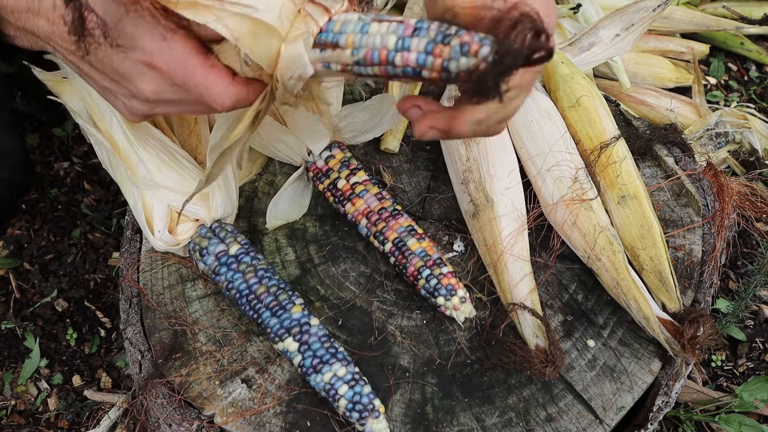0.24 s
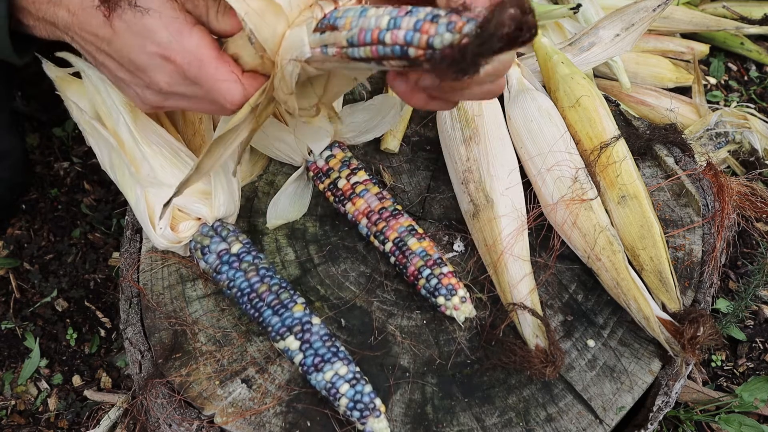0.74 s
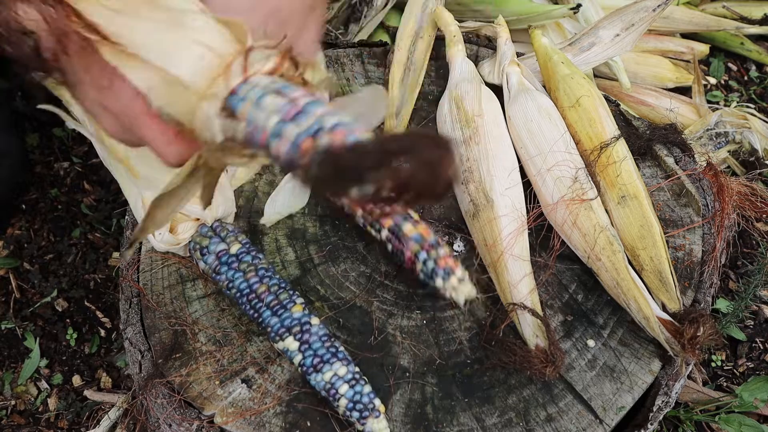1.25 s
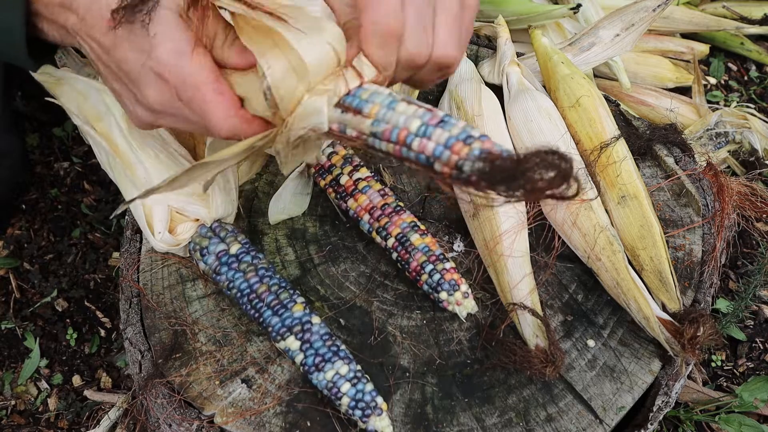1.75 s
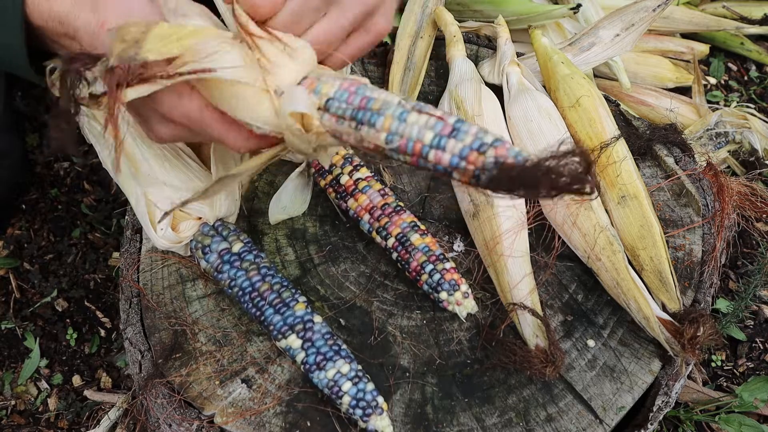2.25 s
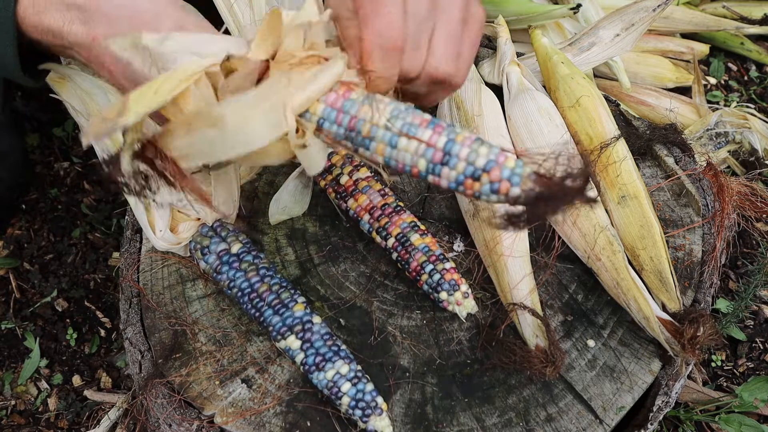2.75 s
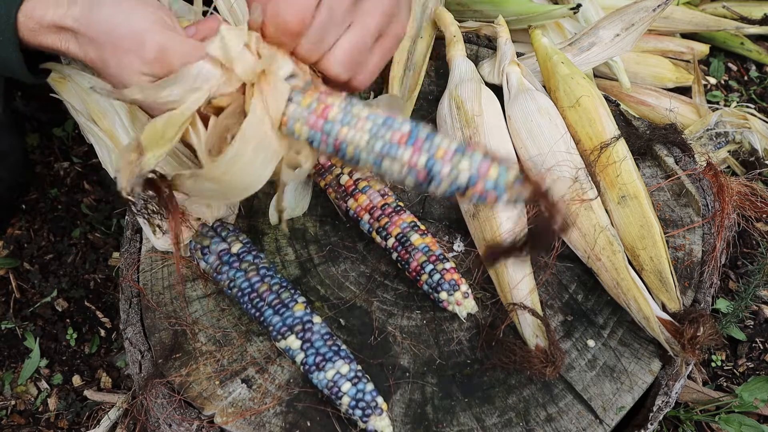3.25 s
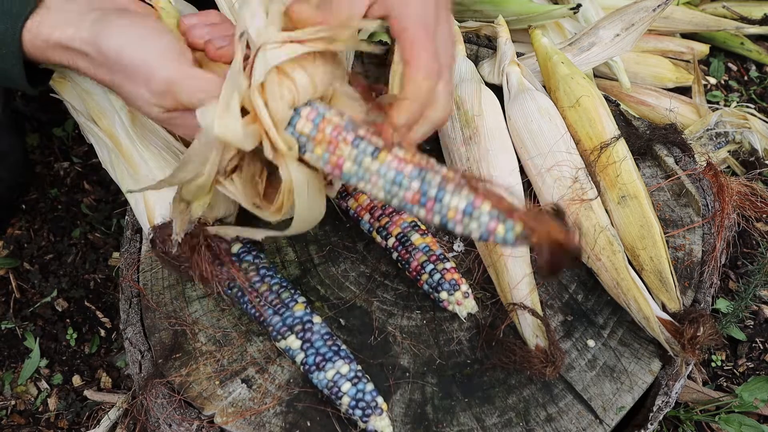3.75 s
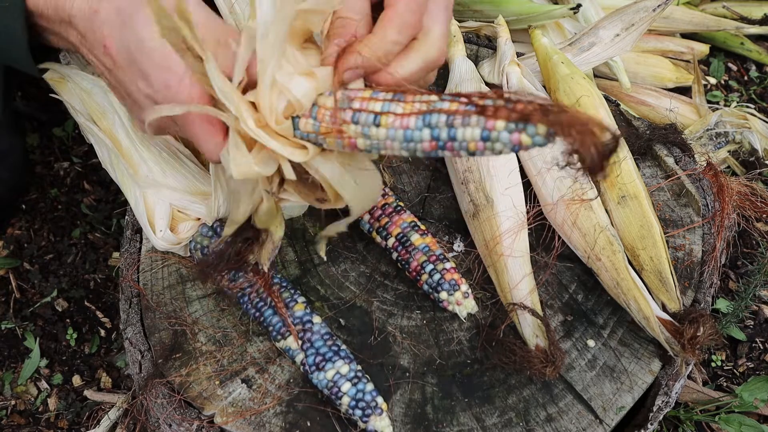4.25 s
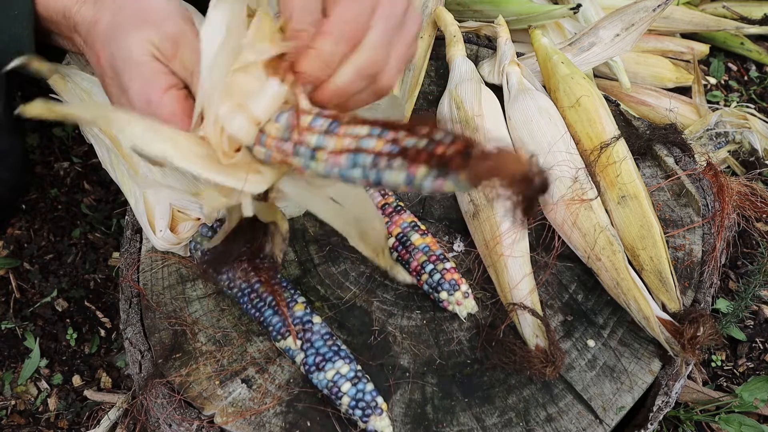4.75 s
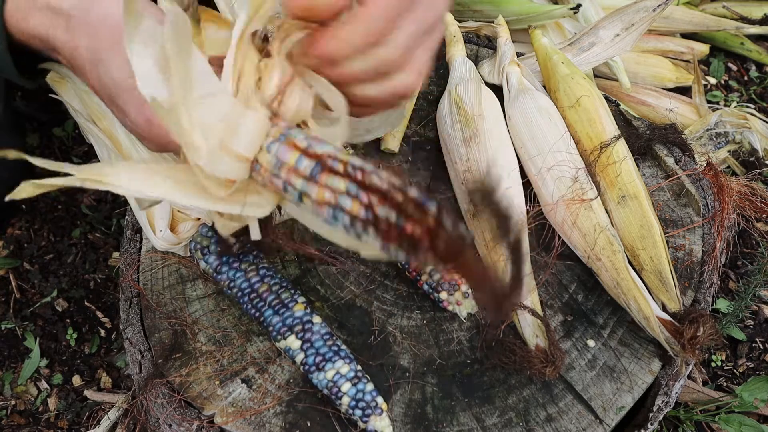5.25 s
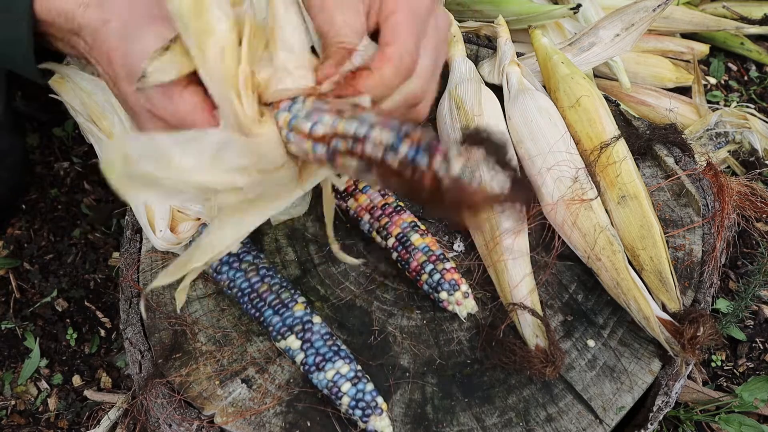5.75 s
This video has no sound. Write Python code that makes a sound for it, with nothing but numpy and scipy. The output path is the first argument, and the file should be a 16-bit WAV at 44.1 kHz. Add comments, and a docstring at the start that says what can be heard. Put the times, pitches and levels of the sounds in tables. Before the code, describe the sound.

Close, crisp rustling and fibrous tearing of dry husk, with brittle cracks, tiny ticks and one dull knock, in quiet outdoor air.

```python
"""Hands peel the dry husks back from a corn cob, outdoors, close by.
Each pull rubs leaf on leaf and tears fibres: filtered noise and tiny random impulses make the rustle.
Sharp snaps, where a rib gives way, are short noise bursts that ring the husk; loose fibres tick.
Fingers drag on leaves (soft notes made of impulses); a few dull knocks ring the cob (fading sine waves).
Behind it are outdoor air (filtered noise) and a faint motor hum that comes and goes (a wavering sine)."""
import sys
import numpy as np
from scipy import signal
from scipy.fft import rfft, irfft, next_fast_len
from scipy.io import wavfile
from scipy.ndimage import uniform_filter1d, map_coordinates

SR = 44100
rng = np.random.default_rng(int(sys.argv[2]) if len(sys.argv) > 2 else 0)


def dump(signal):
    """Clip the signal to [-1, 1] and save it as 16-bit WAV at the path in sys.argv[1]."""
    limited = np.clip(np.atleast_2d(signal).T, -1, 1)
    pcm = np.round(limited * 32767).astype(np.int16)
    wavfile.write(sys.argv[1], SR, pcm)


N = 264644  # length of the scene in samples
LEAD_S = .012  # fibres start to give this long before a rib breaks


def amp(db):
    """Turn decibels into a gain."""
    return 10 ** (np.asarray(db) / 20)


def unit(x):
    """Scale x so that its average strength (rms) is 1."""
    return x / np.sqrt(np.mean(x ** 2) + 1e-20)


def shape(points, hz):
    """Gain at each frequency, from (frequency_hz, level_db) points joined on a log axis."""
    point_hz, point_db = np.transpose(points)
    return amp(np.interp(np.log(hz + 1), np.log(point_hz + 1), point_db))


def curve(rows):
    """Join (time_s, value) points into one value per sample."""
    time_s, value = np.transpose(rows)
    return np.interp(np.arange(N) / SR, time_s, value)


def wobble(rate):
    """A smooth random curve through this many random points a second."""
    points = rng.standard_normal(int(N * rate / SR) + 4)
    return map_coordinates(points, [np.arange(N) * rate / SR])


def filtered(x, gain):
    """Filter x to this gain against frequency, with no response ahead of its cause (minimum phase)."""
    size = 2 * next_fast_len(len(x))
    hz = np.fft.rfftfreq(size, 1 / SR)
    cepstrum = irfft(np.log(np.maximum(gain(hz), 1e-6)))
    # folding the second half onto the first puts the response after its cause
    cepstrum[1:size // 2] *= 2
    cepstrum[size // 2 + 1:] = 0
    response = np.exp(rfft(cepstrum))
    return irfft(rfft(x, size) * response)[:len(x)]


def add(track, s, sound):
    """Mix a sound into the track at time s, in seconds."""
    part = track[max(round(s * SR), 0):][:len(sound)]
    part += sound[:len(part)]


def pulling():
    """Levels in dB of rustle, hiss and flutter: pulls take hold, build, slide and let go, over handling."""
    # pulls on the husk: start_s, build_s, slide_s, release_s, peak_db,
    # hiss_db and flutter_db (both relative to the rustle)
    pulls = [(0.024, .005, .014, 0.033, -56, -5, -15.5), (0.135, 0.032, 0.055, 0.052, -67, 1, -17),
             (0.244, 0.0034, 0.072, 0.011, -55, -4.5, -10.5), (1.05, 0.096, 0.0073, 0.031, -48.5, -4.5, -9),
             (1.247, 0.015, .035, 0.035, -48, -12, -11.5), (1.312, 0.002, .014, 0.074, -46, -6, -12),
             (1.341, 0.042, 0.036, 0.1, -50, 2, -3), (1.439, 0.033, 0.089, 0.13, -53, 1, -6),
             (1.722, .054, 0.0097, 0.044, -50.5, -6.5, -11), (1.809, 0.016, 0.058, .08, -53.5, -11, -15),
             (1.955, .025, 0.057, 0.017, -45, -7, -11.5), (2.135, .035, .035, .04, -56, -6, -2),
             (2.205, .012, .06, 0.019, -43.5, -6, -13.5), (2.454, 0.026, 0.059, 0.11, -59, -3, -13),
             (2.753, .015, 0.06, 0.023, -49, -12, -11), (3.018, 0.0064, .06, 0.14, -60, -8.5, -18),
             (3.184, 0.022, 0.026, 0.053, -60, -6, -11), (3.27, .025, .05, 0.029, -42, -6.5, -12),
             (3.412, .025, .03, .06, -51, -9, -14), (3.45, .03, .02, .07, -45, -16.5, -17),
             (3.751, .003, .052, 0.062, -56, -3.5, -14.5), (3.959, 0.0061, 0.078, 0.074, -59, -6, -7.5),
             (4.165, .015, .04, 0.072, -53, -7.5, -10.5), (4.24, 0.018, .038, 0.059, -57, 0, -15.5),
             (4.454, 0.023, 0.021, 0.14, -64, -19, -17), (4.86, .077, .02, .08, -45.5, -6, -11.5),
             (5.05, .064, .016, .06, -43.5, -7.5, -17), (5.369, .003, 0.087, 0.054, -61, -0.5, -19),
             (5.616, .003, .025, 0.049, -51.5, 0, -21), (5.66, 0.019, 0.016, 0.056, -52.5, -16, -19),
             (5.752, 0.0069, 0.038, 0.084, -58.5, -9.5, -30), (5.94, .02, 0.038, 0.037, -43, -9.5, -11.5)]
    # light rustle of the husk held between pulls: time_s, level_db
    handling = [(0, -70), (.4, -81), (.85, -80), (1.0, -65), (1.3, -58), (1.68, -78), (1.9, -60.5),
                (2.07, -72.5), (2.4, -68), (2.62, -72), (3.0, -68), (3.58, -69), (3.95, -64), (4.6, -64),
                (4.8, -69), (5.03, -61.5), (5.21, -78), (5.55, -66.5)]
    held_hiss_db, held_flutter_db = -6.5, -9  # relative to the handling level
    # a pull grows as the leaf tightens and sags as it slides
    build_db_per_s, sag_db_per_s = 199.5, 63.5
    # the grip takes hold over attack_s, ahead of the start; attack and release each span fade_db
    attack_s, fade_db = .02, 31.5

    t = np.arange(N) / SR
    held_db = curve(handling) + np.array([[0], [held_hiss_db], [held_flutter_db]])
    power = amp(held_db) ** 2
    for start, build, slide, release, peak_db, hiss_db, flutter_db in pulls:
        age = t - start
        tightening = build_db_per_s * np.minimum(age - build, 0)
        sagging = sag_db_per_s * np.maximum(age - build, 0)
        taking_hold = np.minimum(age, 0) / attack_s
        letting_go = np.maximum(age - build - slide, 0) / release
        course_db = tightening - sagging + fade_db * (taking_hold - letting_go)
        part_db = peak_db + np.array([[0], [hiss_db], [flutter_db]])
        power += amp(part_db) ** 2 * amp(np.maximum(course_db, -100)) ** 2
    return 10 * np.log10(power)


def rustle(level_db, hiss_db, flutter_db):
    """A harder pull breaks more fibres a second; they come in clumps, over the smooth rub of leaf on leaf."""
    # tone colours of the low flutter, the crackle and the fine hiss: frequency_hz, relative level_db (per Hz)
    flutter_tone = [(60, -43), (200, -2), (330, -3.5), (550, 3), (850, -6), (1250, -6.5), (2200, -34.5)]
    crackle_tone = [(400, -35), (900, -15), (1400, -3), (1950, -3), (2600, 1), (5000, 1.5), (7000, -7),
                    (11000, -29.5)]
    hiss_tone = [(3000, -25.5), (5200, -0.5), (6800, 1), (8500, -2), (10000, -4.5), (12000, -9),
                 (16000, -22)]

    rate = 1300 * amp(.75 * (level_db + 58))  # breaks per second
    grip = unit(amp(0.74 * wobble(60) + 1.64 * wobble(300)))  # uneven strength makes the clumps
    shared = fractures(rate, spread_db=5.0)  # breaks heard in all three parts

    def part(spectrum, rub_db, own_db):
        """One part: shared breaks, its own breaks and the rub, coloured by the husk."""
        own = amp(own_db) * fractures(rate, spread_db=2.0)
        rub = amp(rub_db) * rng.standard_normal(N)
        drive = grip * (shared + own + rub)
        coloured = filtered(drive, lambda hz: shape(spectrum, hz) * husk(hz))
        return unit(flexing(coloured, depth_db=2.5))

    flutter = amp(flutter_db) * part(flutter_tone, rub_db=-2.5, own_db=2.5)
    crackle = amp(level_db) * part(crackle_tone, rub_db=0.5, own_db=-2)
    hiss = amp(hiss_db) * part(hiss_tone, rub_db=3.5, own_db=0.5)
    return flutter + crackle + hiss


def fractures(rate, spread_db):
    """Tiny impulses at random moments, most weak and a few strong, at steady mean power."""
    chance = np.clip(rate / SR, 1e-4, 1)  # of a break in each sample
    strength = np.minimum(rng.exponential(size=N), 3.5)
    sizes = amp(spread_db * strength) * rng.choice([-1, 1], N)
    happens = rng.random(N) < chance
    return unit(happens * sizes / np.sqrt(chance))  # rarer breaks are made larger


def husk(hz, between_db=-8):
    """Gain of the husk: broad, heavily damped resonances, with a floor between them."""
    # resonances of the bunched husk: centre_hz, width_hz, level_db
    resonances = [(1405, 690, -2.5), (2573, 460, -0.5), (3140, 350, -4), (4350, 1250, -5.5),
                  (5700, 540, -8.5), (7000, 2600, -5.5)]
    power = amp(between_db) ** 2
    for centre, width, db in resonances:
        power = power + amp(db) ** 2 / (1 + (2 * (hz - centre) / width) ** 2)
    return np.sqrt(power)


def flexing(x, depth_db):
    """A bending leaf changes shape, so its resonances swell and fade from moment to moment."""
    spectrogram = signal.stft(x, nperseg=256)[2]
    field = rng.standard_normal(spectrogram.shape)
    field = uniform_filter1d(field, size=6, axis=0)  # smooth across frequency
    field = uniform_filter1d(field, size=9, axis=1)  # smooth across time
    return signal.istft(spectrogram * amp(depth_db * unit(field)), nperseg=256)[1][:N]


def snaps():
    """The ribs give way one by one, each with its own level, pitch and length of splintering."""
    # ribs that break: time_s, level_db, pitch_hz,
    # splinter_t60_s (time to fade by 60 dB: short = clean click, long = crunch)
    ribs = [(0.0155, -50.5, 4630, 0.0067), (0.0257, -45, 3880, 0.0049), (0.0466, -58, 4050, 0.0044),
            (0.2447, -49.5, 3790, .015), (0.4978, -66.5, 3820, 0.0094), (0.6456, -57.5, 6760, 0.0054),
            (0.651, -63, 4350, 0.031), (0.822, -70, 2700, .04), (1.1438, -38.5, 3530, 0.0076),
            (1.1545, -38.5, 3450, 0.0088), (1.223, -43, 5995, .005), (1.2264, -42, 7000, 0.0055),
            (1.2498, -63, 2900, .008), (1.312, -27.5, 4070, .014), (1.3234, -32.5, 3400, 0.026),
            (1.6153, -52.5, 4395, 0.02), (1.658, -58.5, 5830, .006), (1.6964, -59, 5260, .006),
            (1.7681, -44, 3770, 0.0065), (1.9469, -40.5, 3840, 0.0078), (1.9715, -42, 3320, 0.0088),
            (1.98, -35.5, 3120, 0.011), (2.1275, -54, 2690, 0.0074), (2.1464, -47, 2560, 0.0098),
            (2.1741, -44.5, 2900, 0.014), (2.2111, -22, 3740, 0.0053), (2.2137, -31.5, 3998, .015),
            (2.235, -36, 3450, 0.0099), (2.2595, -38, 4710, 0.0062), (2.272, -36.5, 4790, .008),
            (2.281, -48, 3900, .006), (2.4617, -52, 2400, 0.0074), (2.6924, -52.5, 2650, 0.0085),
            (2.7984, -44.5, 2710, 0.0077), (2.9385, -38.5, 3890, 0.01), (3.015, -44.5, 3300, 0.053),
            (3.075, -54.5, 3900, 0.016), (3.1312, -55, 6550, 0.0056), (3.178, -55.5, 4840, 0.0051),
            (3.2172, -44, 2810, 0.013), (3.238, -47, 3100, 0.0083), (3.2595, -36.5, 3520, 0.0052),
            (3.265, -37, 3720, 0.0033), (3.291, -30.5, 4000, 0.021), (3.3828, -57, 4400, 0.0043),
            (3.4906, -39.5, 3047, .006), (3.4993, -36, 3066, 0.0072), (3.5133, -37, 3260, .006),
            (3.6196, -50, 3635, 0.0064), (3.7497, -47, 3860, 0.008), (3.7997, -49, 4650, 0.0067),
            (4.087, -46.5, 3600, 0.033), (4.2968, -48, 4890, 0.0068), (4.3301, -51.5, 2710, 0.0057),
            (4.554, -53.5, 5480, .03), (4.5883, -51, 4200, 0.0062), (4.61, -52.5, 3000, 0.0087),
            (4.712, -48.5, 2564, 0.0049), (4.939, -31, 3940, .005), (4.9543, -36.5, 5860, 0.015),
            (5.0311, -50.5, 2083, 0.0071), (5.112, -36, 3180, 0.01), (5.1228, -36, 2330, 0.011),
            (5.3173, -55, 3100, 0.015), (5.3688, -47.5, 2780, 0.01), (5.4474, -50.5, 6000, 0.0086),
            (5.5257, -48.5, 3616, .01), (5.6107, -44.5, 5260, .025), (5.6888, -44, 3080, .01),
            (5.927, -41, 2300, 0.016)]
    track = np.zeros(N)
    for s, db, pitch_hz, splinter_t60 in ribs:
        add(track, s - LEAD_S, amp(db) * snap(pitch_hz, splinter_t60))
    return track


def snap(pitch_hz, splinter_t60, octaves=0.65, skirt=0.017, splinter_db=-13, lead_share=0.52,
         grain_db=4, scatter_db=-41, scatter_t60=0.18):
    """One break: splinters swell to a kick at LEAD_S and die away, ringing the husk around a pitch."""
    # spectrum of a breaking rib: frequency_hz, relative level_db (per Hz)
    crack = [(80, -27), (300, 9.5), (900, 9), (1500, 3.5), (3000, -0.5), (7000, -0.5), (11000, -4),
             (16000, -13)]
    size = 2048
    t = (np.arange(size) - round(LEAD_S * SR)) / SR
    away = np.maximum(t, -t / lead_share)  # the swell is faster than the decay
    splinters = amp(splinter_db - 60 * away / splinter_t60)
    scatter = amp(scatter_db - 60 * away / scatter_t60)  # a weaker, longer tail
    grain = unit(amp(grain_db * np.repeat(rng.standard_normal(size // 16), 16)))  # uneven in 16-sample steps
    kick = (t == 0) + (splinters + scatter) * grain * rng.standard_normal(size)

    def colour(hz):
        """The crack through the husk, strongest around the pitch."""
        focus = skirt + 1 / (1 + (np.log2((hz + 1) / pitch_hz) / octaves) ** 2)
        return shape(crack, hz) * husk(hz) * focus

    sound = filtered(kick, colour)
    loudest = uniform_filter1d(sound ** 2, size=SR // 500).max()
    return sound / np.sqrt(loudest)  # rms 1 over the loudest 2 ms


def ticks(level_db, count=340, tick_db=-61, follow=0.6, crowding=.3, spread_db=3.0,
          pitch_hz=4200, pitch_spread=0.43):
    """Loose fibres tick at random, each at its own pitch, louder and more often as the husk is worked."""
    track = np.zeros(N)
    effort_db = level_db - np.median(level_db)
    work = np.cumsum(amp(crowding * effort_db))  # climbs faster, so catches more ticks, during effort
    for place, (loudness, tone) in zip(rng.random(count), rng.standard_normal((count, 2))):
        at = np.searchsorted(work, place * work[-1])
        db = tick_db + follow * effort_db[at] + spread_db * np.clip(loudness, -2, 2)
        tick = snap(pitch_hz * np.exp(pitch_spread * tone), splinter_t60=0.0046)
        add(track, at / SR - LEAD_S, amp(db) * tick)
    return track


def drags(sharpness=2.8):
    """Skin sticks and slips on a leaf, which answers with one soft, hollow note."""
    # a finger drags on a leaf: start_s, length_s, level_db (before the swell), pitch_hz
    strokes = [(0.951, 0.065, -64, 2120), (1.034, 0.09, -60.5, 1947), (1.37, 0.061, -56, 423),
               (2.308, 0.058, -67, 855), (2.379, 0.098, -65, 953), (3.08, 0.044, -64, 550),
               (4.446, 0.065, -62, 3590)]
    track = np.zeros(N)
    for s, length, db, pitch_hz in strokes:
        swell = np.hanning(max(round(length * SR), 8))
        slips = fractures(2000, spread_db=0.5)[:len(swell)]
        note = filtered(slips, lambda hz: 1 / (1 + (sharpness * np.log2((hz + 1) / pitch_hz)) ** 2))
        add(track, s, amp(db) * swell * unit(note))
    return track


def bumps(attack_s=0.00096, bass_limit_hz=150):
    """A soft blow of the hand rings the cob; the hand damps it at once."""
    # dull knocks of the hand on the cob: time_s, level_db (gain on the ringing)
    knocks = [(0.313, -54), (0.4966, -56.5), (1.54, -30), (1.582, -49)]
    # tones of the cob held in the hand: pitch_hz, level_db, t60_s (time to fade by 60 dB)
    cob_tones = [(259.4, 3.5, 0.019), (410, 0, 0.018), (990, -1, 0.017), (1578, -9, 0.0096)]
    track = np.zeros(N)
    t = np.arange(SR // 10) / SR
    ring = sum(amp(db - 60 * t / t60) * np.sin(2 * np.pi * hz * t) for hz, db, t60 in cob_tones)
    knock = ring * (1 - np.exp(-t / attack_s))
    for s, db in knocks:
        add(track, s, amp(db) * knock)
    # so small a body radiates no deep bass
    highpass = signal.butter(3, bass_limit_hz, "high", fs=SR, output="sos")
    return signal.sosfilt(highpass, track)


def background(hum_hz=133.7, waver_hz=0.51, air_db=-70.5):
    """A distant motor hums on one slightly wavering note in the outdoor air."""
    # the far hum coming and going: time_s, level_db
    hum_levels = [(0.0, -85), (0.18, -73), (0.4, -80.5), (0.77, -74), (0.97, -84), (1.37, -67), (1.69, -84),
                  (2.39, -66.5), (3.21, -82), (3.69, -69.5), (5.06, -74), (5.7, -68.5), (6.0, -70.5)]
    # tone colour of outdoor air: frequency_hz, relative level_db (per Hz)
    air_tone = [(20, -36), (32, -17), (39, -9.5), (48, -5), (92, 4), (125, -0.5), (250, -5.5), (500, -9.5),
                (950, -12), (1400, -20), (3000, -26.5), (4200, -23.5), (5500, -30), (9000, -27.5),
                (16000, -36.5)]
    phase = 2 * np.pi * np.cumsum(hum_hz + waver_hz * wobble(3.86)) / SR
    hum = amp(curve(hum_levels)) * unit(np.sin(phase))
    air = unit(filtered(rng.standard_normal(N), lambda hz: shape(air_tone, hz)))
    return hum + amp(air_db) * air


def scene():
    """The husk and cob in front of the quiet background, as one channel."""
    level_db, hiss_db, flutter_db = pulling()
    peeling = rustle(level_db, hiss_db, flutter_db) + snaps() + ticks(level_db)
    return (peeling + drags() + bumps() + background())[None]


def record(dry, top_hz=15850):
    """The recorder keeps nothing above its band limit."""
    size = next_fast_len(N + SR // 2)
    kept = np.fft.rfftfreq(size, 1 / SR) < top_hz
    return irfft(rfft(dry, size) * kept, size)[:, :N]


dry = scene()
out = record(dry)
dump(out)
```